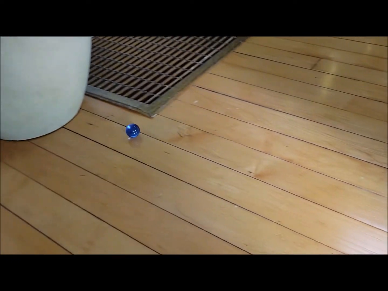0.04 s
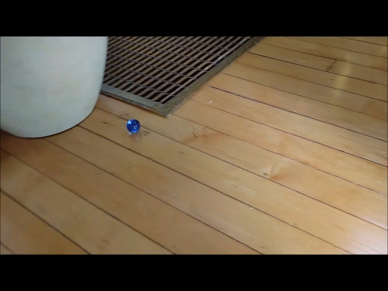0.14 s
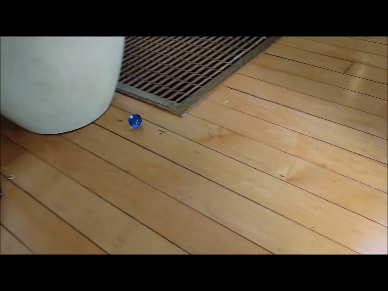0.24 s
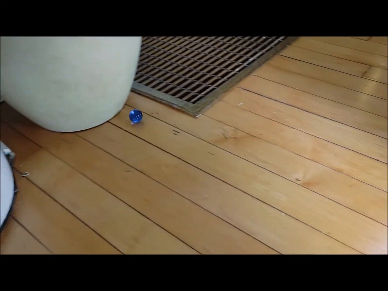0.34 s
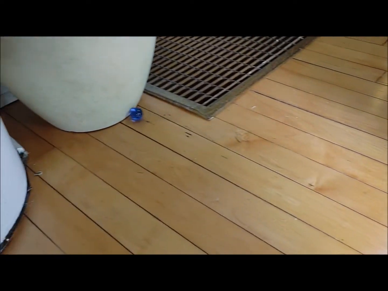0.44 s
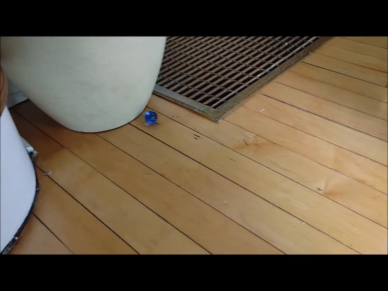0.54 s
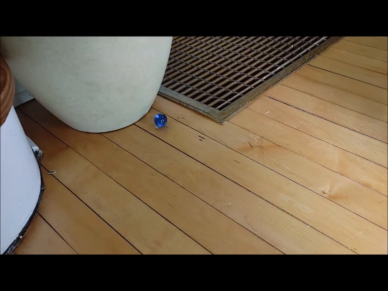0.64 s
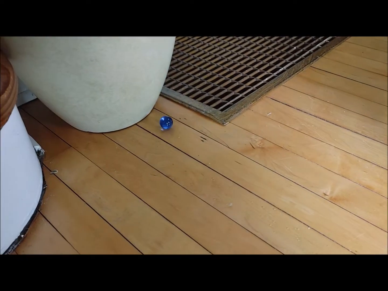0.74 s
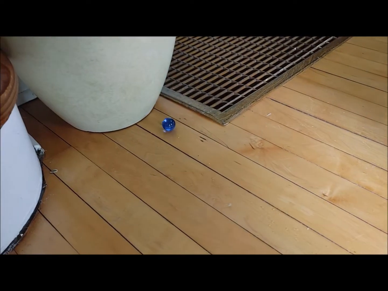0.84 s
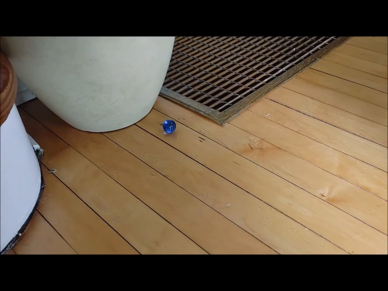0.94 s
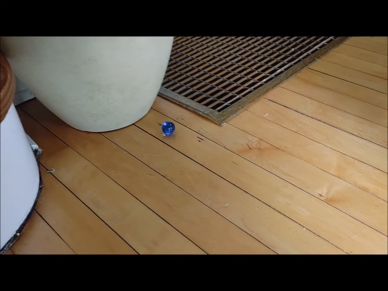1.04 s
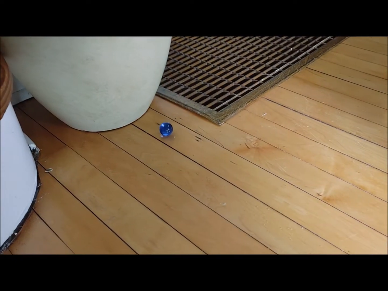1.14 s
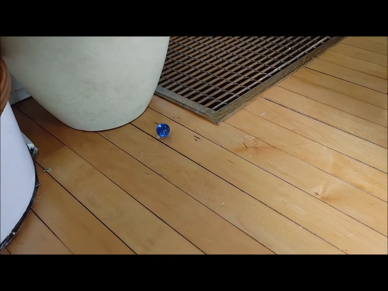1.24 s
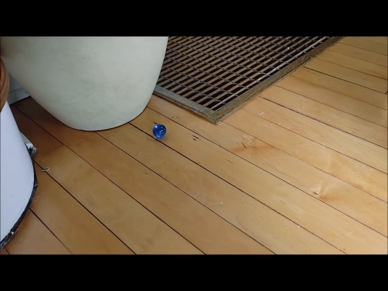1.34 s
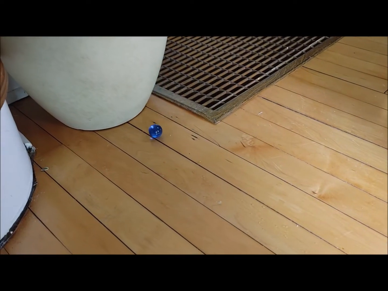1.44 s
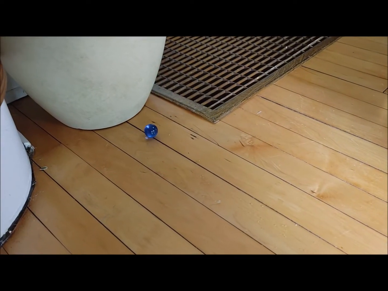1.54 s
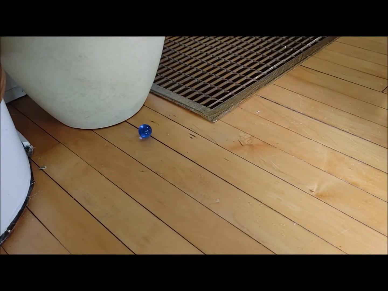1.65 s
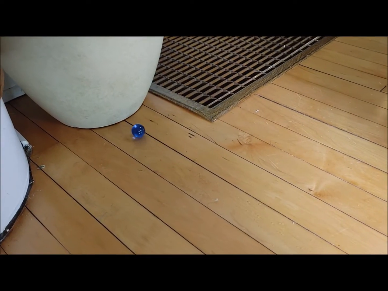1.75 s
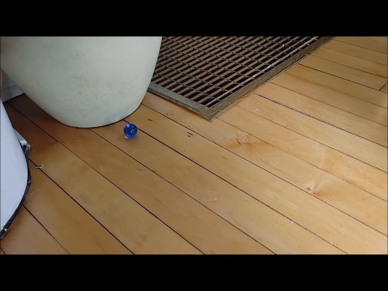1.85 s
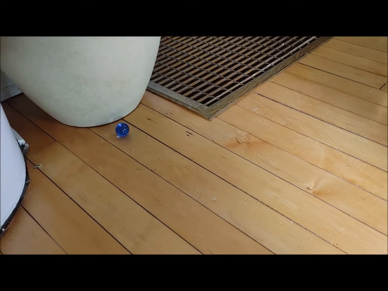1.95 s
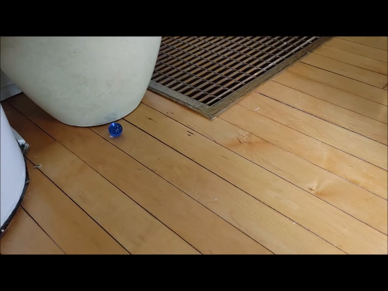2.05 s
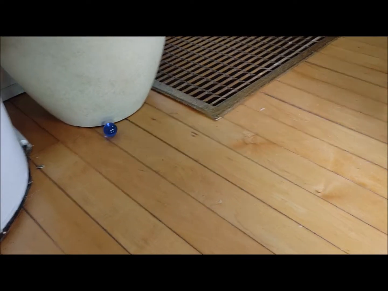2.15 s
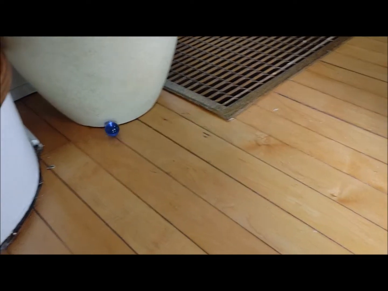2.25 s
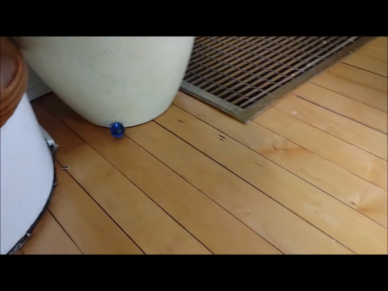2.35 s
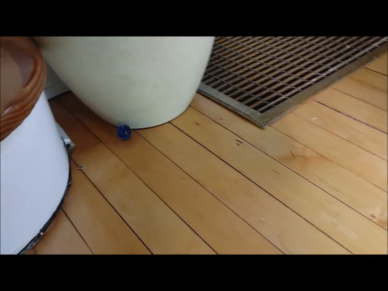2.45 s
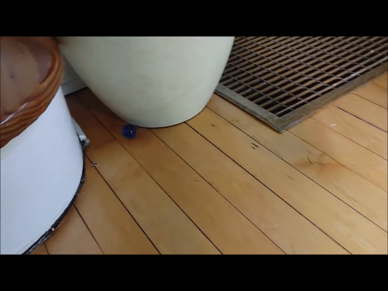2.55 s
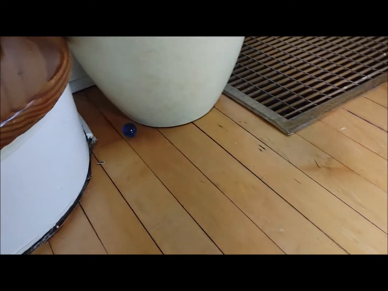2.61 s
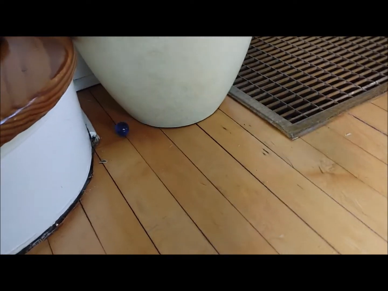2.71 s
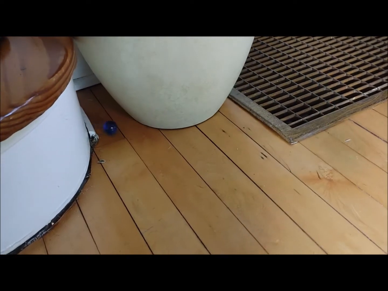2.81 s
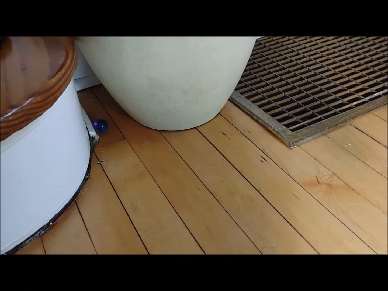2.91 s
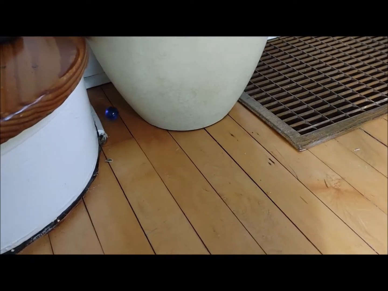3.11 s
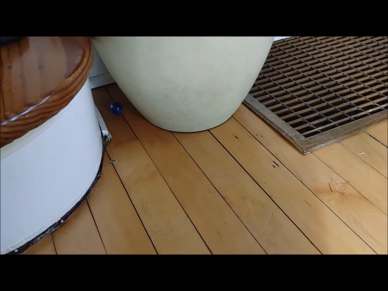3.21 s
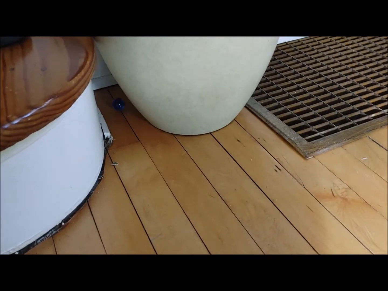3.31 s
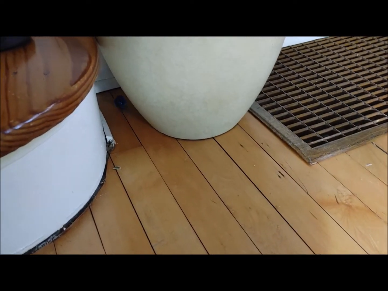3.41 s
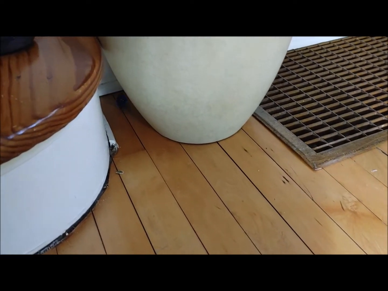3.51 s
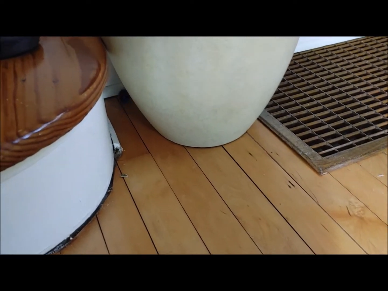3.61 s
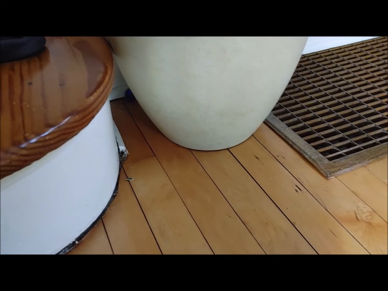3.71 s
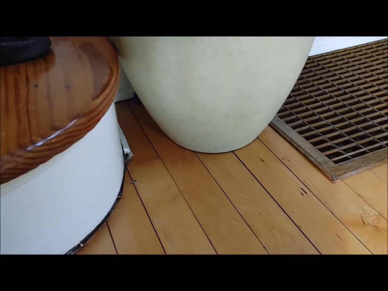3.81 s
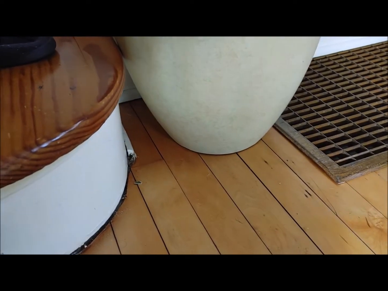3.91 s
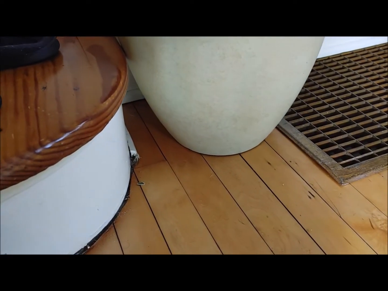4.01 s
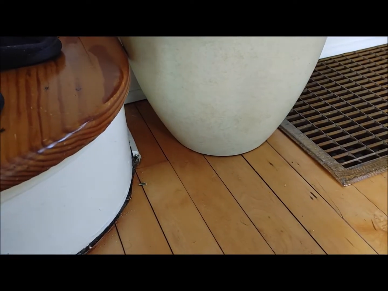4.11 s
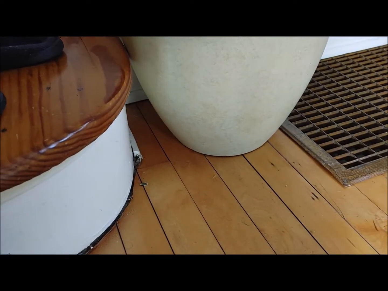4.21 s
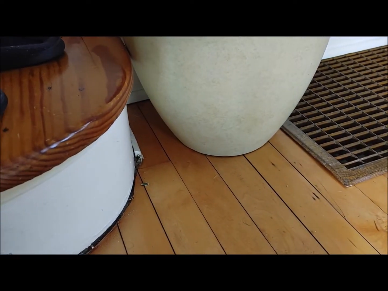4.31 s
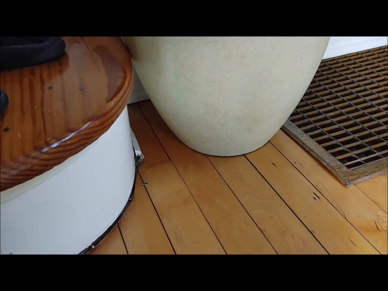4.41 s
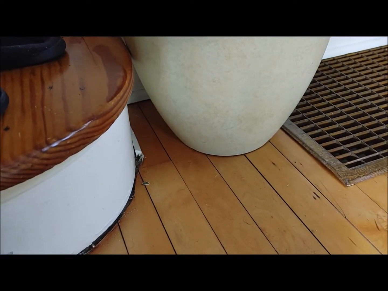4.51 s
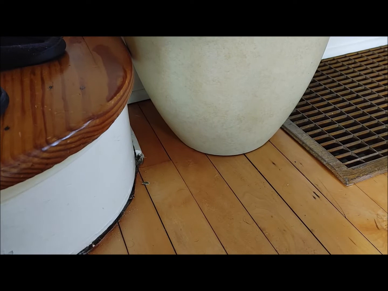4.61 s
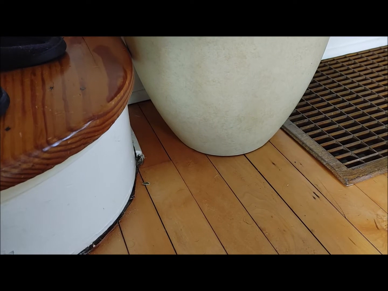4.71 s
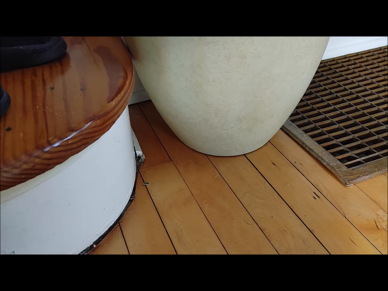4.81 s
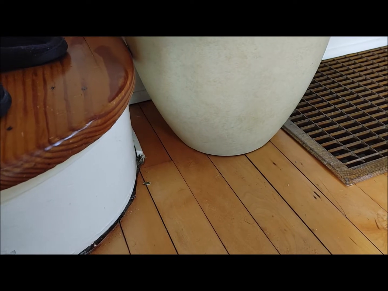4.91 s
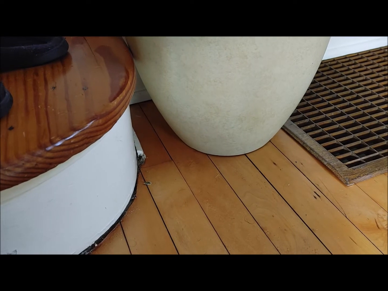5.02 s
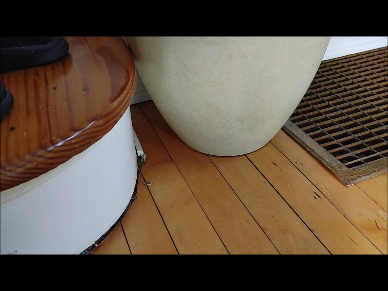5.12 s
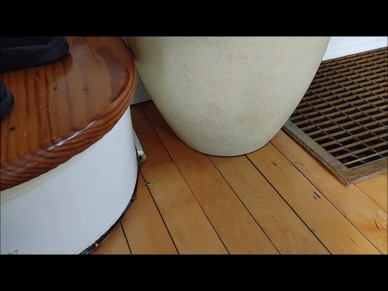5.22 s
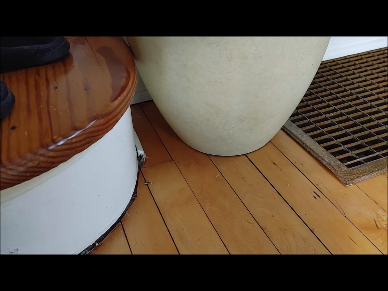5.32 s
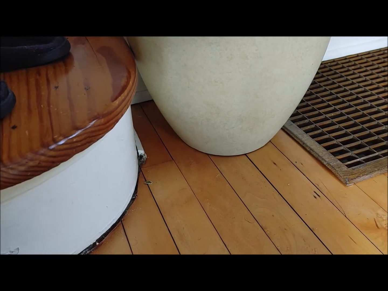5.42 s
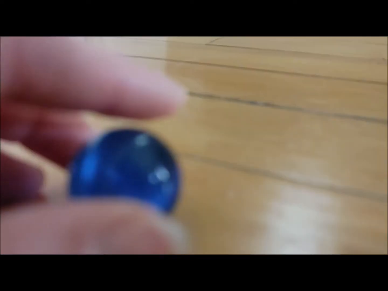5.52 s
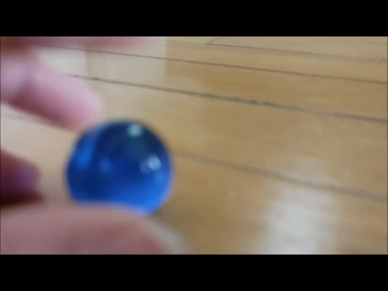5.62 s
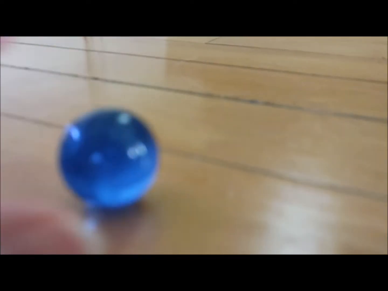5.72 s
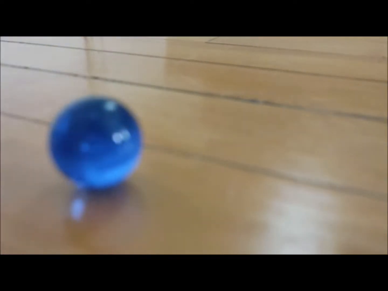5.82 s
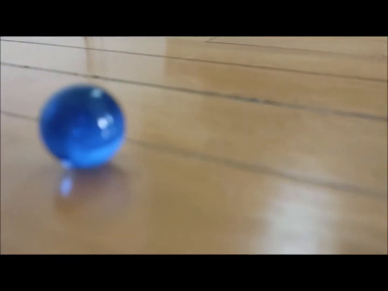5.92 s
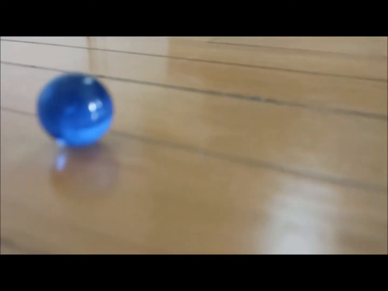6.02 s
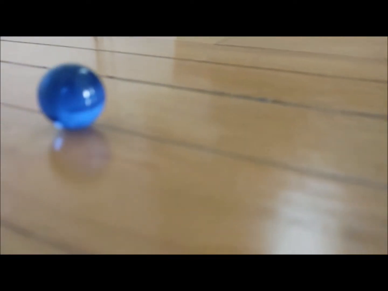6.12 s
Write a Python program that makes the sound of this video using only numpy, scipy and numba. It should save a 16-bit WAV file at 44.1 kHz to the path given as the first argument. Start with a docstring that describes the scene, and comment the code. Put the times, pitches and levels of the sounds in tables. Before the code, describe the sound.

A marble runs over wooden boards with hollow rattling, strikes a grate sharply, then nearly hushes. Sparse ticks grow into clicks and a deep woody rumble, stopped by a loud knock near a clay pot. Faint humming and a double tap follow. Sound cuts out briefly, then returns with a stronger low hum, a close hissing skin rub and light rolling ticks. Stereo microphone, short indoor echo.

```python
"""A glass marble rolls over wooden floorboards: its bumpy contact drives the boards' resonances. Seams, a grate
rim and a pot give knocks of ringing modes and a crack, and so do the hand's fingers catching on the floor; the
grate's slats ring on, a clay pot hums. The place is a small quiet room, a short diffuse echo over air noise and
an appliance hum. After a short silence a hand slides over the floor close to the microphone: hissing, rubbing
filtered noise. From the start of that silence the appliance hum is louder, and so is the air noise below 500
Hz."""
import sys
import numpy as np
from scipy import signal
from scipy.fft import rfft, irfft
from scipy.io import wavfile
from scipy.ndimage import uniform_filter1d, map_coordinates
from numba import njit

SR = 44100
rng = np.random.default_rng(int(sys.argv[2]) if len(sys.argv) > 2 else 0)


def wrap_up_sound(samples):
    """Save the sound to the file named by the first command line argument, as 16-bit audio."""
    columns = np.atleast_2d(samples).T
    # keep every value between -1 and 1, then stretch to whole-number steps
    tamed = np.clip(columns, -1, 1)
    steps = np.round(tamed * 32767).astype(np.int16)
    wavfile.write(sys.argv[1], SR, steps)


N = 271215

# steady air noise in the room: [f/Hz, relative level per Hz/dB]
AIR_SPECTRUM = [(30, -1.5), (70, -9.5), (115, 0), (184, -9), (239, -2), (290, -16), (437, -8.5), (822, -17),
                (1100, -24.5), (2410, -28), (6000, -40.5), (8000, -42), (11500, -35), (16000, -34.5)]
# appliance hum at a distance, before its level wavers: [f/Hz, rms level/dB]
HUM_FAR = [(118.4, -72.5), (215, -67.5), (241, -66)]
# appliance hum close by, before its level wavers: [f/Hz, rms level/dB]
HUM_NEAR = [(79.5, -55.5), (118.4, -46.5), (157, -58.5), (239, -68)]
# boards under the rolling marble:
# [t/s, lowest resonance before wander f/Hz, its level/dB, second and upper resonances relative level/dB]
ROLL_PATH = [(0.0, 267.7, -41.5, 13, 6), (.07, 263.7, -45, 2.5, -3.5), (.14, 270, -40.5, 1, -10.5),
             (0.22, 263, -41, 1, -4.5), (.3, 294, -43, 0, -5), (.38, 299, -46.5, -4.5, -1),
             (.45, 310, -35, -15.5, -5), (0.51, 320, -46.5, -6, 10), (0.56, 313.2, -57.5, 3.5, 10),
             (0.95, 275.3, -64, -8, -26), (1.5, 291.8, -68.5, -16, -27), (1.9, 393.3, -58.5, -11, -18.5),
             (2.2, 390, -54.5, -2, -12.5), (2.42, 385.5, -50, 6, -4), (2.62, 380, -49.5, 0, -0.5),
             (2.8, 372.4, -36, -14.5, -35), (2.96, 377, -36, -21.5, -33), (3.02, 384.6, -30, -3.5, -25.5),
             (3.08, 385, -38.5, -22.5, -31), (3.2, 387, -40, -24.5, -34.5), (3.4, 386, -35.5, -21, -33.5),
             (3.6, 377, -38.5, -20, -32), (3.74, 365, -31, -11, -18), (3.9, 395, -54, -17, -22),
             (4.3, 381, -67, -4, -20.5), (4.6, 385, -58, -13, -28), (5.0, 301, -80.5, -16, -26),
             (5.5, 271.2, -56.5, -17.5, -8), (5.72, 299, -58.5, 1.5, -3.5), (5.85, 320, -56.5, 9, -6),
             (5.94, 331, -54.5, 5.5, 6.5), (6.03, 297.5, -46, -12.5, -22), (6.09, 299.7, -44.5, 0, -12),
             (6.15, 318, -49, -10, -10)]
# upper board modes: [f/Hz, nominal width/Hz, relative level/dB]
BOARD_MODES = [(780, 78, 4), (894, 230, 17), (1136, 120, 9.5), (1330, 160, 0), (1620, 180, -5),
               (1884, 80, -4.5), (2380, 118.2, -4.5), (2950, 200, -11.5)]
# fine grit of the varnish: [t/s, centre before wander f/Hz, level/dB]
VARNISH_GRIT = [(0, 6750, -74.5), (.3, 6500, -67), (.52, 6700, -69.5), (.75, 6690, -89), (1.95, 6000, -96),
                (2.1, 6200, -74), (2.32, 6930, -66.5), (2.5, 6600, -67), (2.9, 6400, -81.5),
                (3.02, 6550, -67), (3.2, 6600, -68), (3.32, 6400, -89), (3.45, 6400, -100),
                (5.8, 6530, -100), (5.95, 6500, -86.5), (6.15, 6500, -69)]
# decay of the room's echo: [f/Hz, t60/s]
ROOM_DECAY = [(150, 0.14), (500, 0.36), (2000, 0.27), (6000, 0.27), (12000, 0.087)]
# knocks: [t/s, nominal peak level/dB, strongest ring f/Hz, thud f/Hz,
#          thud relative level/dB, tick relative level/dB, left minus right level/dB]
KNOCKS = [(0.035, -31, 1300, 247, -14, -42, -6), (0.137, -37, 1370, 407, 1, -29.5, -7),
          (0.158, -25, 2980, 667, -1, -31.5, 9.5), (0.181, -19.5, 2950, 377, -7.5, -36, -12.5),
          (0.26, -31, 1950, 310, -22, -43.5, -6.5), (0.393, -29.5, 1070, 476, -6.5, -33, -7),
          (0.433, -24.5, 1070, 197, -7, -34.5, -11), (0.506, -26.5, 1290, 336, -12.5, -37.5, -10.5),
          (0.5245, -14, 1380, 215, -1, -4.5, -15.5), (0.806, -59.5, 837, 249, 24.5, -5, -14),
          (1.678, -38, 1158, 591, 3.5, -28.5, 10), (1.852, -56.5, 800, 429, 15, -14, -2),
          (1.986, -49, 2430, 348, -21, -2.5, -19), (2.08, -59, 860, 423, 25.5, -15, 0),
          (2.108, -58, 700, 434, 21.5, -11, -2.2), (2.383, -29.5, 1456, 627, -11.5, -44, -5),
          (2.412, -38, 996, 632, -1, -6, -18.5), (2.503, -44, 1920, 380, -16, -22, -4),
          (2.52, -44.5, 1920, 630, 2, -14, -9), (2.588, -44.5, 1940, 384, 10, -17.5, 14.5),
          (2.661, -42.5, 955, 388, 4, -20, -4), (2.728, -32.5, 1100, 408, -2.5, -40, 0.5),
          (2.743, -31.5, 1113, 374, -17, -30, 6.5), (2.771, -48.5, 1030, 404, 3, -43, -6),
          (2.933, -52.5, 1100, 390, 16.5, -25.5, -2), (2.994, -27.5, 2030, 593, -5, -12, -3),
          (3.006, -31, 960, 361, 11.5, -22, -1), (3.297, -57, 1200, 430, 2.5, -1, -25),
          (3.331, -41.5, 1264, 380, 4, -36.5, 0), (3.349, -49, 1314, 400, 6.5, -42.5, -4),
          (3.435, -65, 1200, 393, 2, 0, -2), (3.475, -38.5, 1520, 418, -2.5, -41.5, 10),
          (3.643, -48.5, 1060, 380, 4.5, -27.5, -2.5), (3.674, -23, 2240, 326, -21.5, -44, 8),
          (3.754, -12, 2122, 388, -13.5, -1.5, -9), (3.7575, -23.5, 1384, 386, -7, -18.5, -1),
          (3.772, -22.5, 1080, 390, 4.5, -4, 4), (4.032, -57, 1075, 389, 16.5, -21, -3),
          (4.094, -50.5, 876, 387, 11, -41, 9), (4.197, -57, 857, 387, 16, -24, -8),
          (4.478, -57.5, 857, 261, 17, -20, -1), (4.66, -56, 872, 430, 15, -18, 2),
          (4.835, -27.5, 1008, 488, -7, -8.5, -12), (4.849, -38, 1010, 406, 9, -9, 5),
          (5.852, -51, 4250, 300, -17, -8, -5), (5.918, -43, 2940, 584, -15, -16, -27),
          (5.951, -40.5, 1526, 501, 0.5, -9.5, -30), (6.005, -41.5, 1070, 299, 8, -46, -7),
          (6.048, -44, 1350, 600, 5, -46, -5.5), (6.081, -45.5, 1106, 497, 6.5, -45, -4),
          (6.115, -43.5, 930, 618, 11, -32, 4), (6.139, -45.5, 1030, 272, 15, -22, -11)]
# wood modes that a knock rings, before random spread: [f/Hz, relative level/dB, t60/s]
WOOD_MODES = [(140, -4, .2), (190, -4, .12), (240, -2, .1), (310, 0, .08), (385, 0, .07), (480, -2, .05),
              (640, -3, .035), (800, -3, .03), (930, -2, .03), (1050, 0, .04), (1190, -2, .025),
              (1380, -1, .03), (1850, -3, .02), (2030, -1, .02), (2430, -3, .015), (2800, -2, .02),
              (3070, 0, .022), (5300, -6, .012)]
# grate slats after the marble strikes the rim: [f/Hz, relative level/dB, t60/s]
GRATE_MODES = [(285, -8.5, 0.32), (365, -7, .25), (580, 5.5, 0.069), (687, -4.5, 0.26), (927, -3.5, 0.27),
               (1084, -15.5, 0.12), (1280, -7.5, 0.2), (1340, -13.5, 0.11), (1830, -16.5, .13),
               (5600, -18.5, 0.26), (5545, -23.5, 0.25), (6020, -14, 0.18)]
# faint hum of the clay pot while the marble rolls behind it: [start t/s, length/s, level/dB]
POT_SWELLS = [(4.05, 0.22, -61.5), (4.45, 0.21, -63), (5.05, 0.29, -72.5)]
# skin sliding on the floor: [t/s, squeak level/dB, broad rub level/dB]
HAND_SLIDE = [(5.67, -100, -96), (5.71, -65.5, -68.5), (5.77, -46, -52.5), (5.81, -48.5, -45),
              (5.85, -50, -40), (5.88, -92, -49.5), (5.92, -74.5, -41), (5.955, -57.5, -38.5),
              (5.99, -96, -89)]
# bands of the rub: [f/Hz, nominal width/Hz, relative level/dB]
RUB_BANDS = [(1104, 370, -12), (1472, 130, -4.5), (2040, 120, 0.5), (2770, 150, 2.5), (3510, 170, 3.5),
             (4050, 130, -2.5), (5340, 900, -18.5), (8610, 380, -10.5), (11840, 4000, -16)]
# microphone response: [f/Hz, gain/dB]
MIC_RESPONSE = [(40, -17), (110, -0.5), (5000, -2), (6800, -3.5), (7400, -10), (8100, -10), (9500, -6),
                (16000, -8)]

# place and microphone
SILENCE_START_S, SILENCE_END_S = 5.372, 5.506
AIR_DB, NEAR_AIR_DB = -57.5, 8.5
ROOM_DB = 2
PORT_LAG_S = 0.00018
SOFT_TOP = 0.8  # peaks round off towards this level
TOP_HZ = 15900

# rolling
FAST_UNTIL_S = .522  # the marble meets the grate rim
BOARD_WANDER, PATCHY_DB = 0.15, 2
SECOND_HZ, SECOND_WIDTH_HZ = 630.5, 60
SECOND_NEAR_GRATE_HZ = 683  # the boards crossed before the rim ring a little higher
BETWEEN_HZ, BETWEEN_DB = 480.6, -7.5  # a broad resonance between the two lowest
FAST_RATTLE_DB, RATTLE_ABOVE_HZ = 9, 1500  # the quick first run shakes the highest board modes harder
GRIT_BELOW_HZ, GRIT_BELOW_DB = 3700, 1  # a duller, wider part of the grit

# knocks: share sent to the room in the open, hidden behind the pot, and close by after the silence
KNOCK_ROOM_DB, HIDDEN_ROOM_DB, CLOSE_ROOM_DB = -4.5, -0.5, -9.5
HIDDEN_FROM_S = 3.72
ROOM_DULLING = 0.18  # dB per octave lost on the way to the room, for each dB that the tick is weak
PAN_FULL_HZ = 2480  # below this a knock sounds ever more alike at both ports
RIM_S, RIM_TOP_DB = .5245, 12  # the metal rim of the grate gives a brighter knock
TOP_DB, TOP_PER_TICK = -30, .6
SWELL_CYCLES = 1.5  # a mode needs this long to build up, so the low ones come late
RING_S, RING_SHORTENS = 0.0077, 0.82  # decay of a spot at 1 kHz; higher ones die faster by this power
SPOT_IN_ROOM = 0.57  # the spot's own rings carry less far
SPOT_LOSS, FIRM_TICK_DB = 0.37, -25.5  # a tick above this costs the spot's ring so many dB per dB
ECHO_S, ECHO_SHARE = 0.000976, 0.26  # the crack comes again off a hard surface close by

# grate, pot and hand
GRATE_DB, GRATE_CHATTER_DB = -27.5, 3
POT_HZ, POT_FADE_S = 857, 0.07
SQUEAK_HZ, SQUEAK_LOWEST_HZ = 6900, 5830
SQUEAK_SINKS_S, SQUEAK_SINK_HZ_PER_S = 5.81, 60000


def undb(db):
    """Amplitude factor for a level in dB."""
    return 10 ** (np.asarray(db) / 20)


def unit(x):
    """Scales to an rms of 1."""
    return x / np.sqrt(np.mean(x ** 2))


def along(table, hz):
    """Reads (f/Hz, value) rows on a log-frequency axis."""
    f, v = np.transpose(table)
    return np.interp(np.log(np.maximum(hz, 1)), np.log(f), v)


def curves(rows):
    """Joins the rows of a t/s table into one curve per column."""
    s, *columns = np.transpose(rows)
    return [np.interp(np.arange(N) / SR, s, c) for c in columns]


@njit
def svf(x, hz, width):
    """State-variable band-pass with a moving centre, gain 1 there."""
    y, b, l = np.empty(len(x)), 0., 0.
    for i in range(len(x)):
        g, k = np.tan(np.pi * hz[i] / SR), width / hz[i]
        v = (b + g * (x[i] - l)) / (1 + g * (g + k))
        b, l, y[i] = 2 * v - b, l + 2 * g * v, k * v
    return y


def band(x, hz, width):
    """Band-pass at a fixed or moving centre, kept within a safe range."""
    return svf(x, np.clip(hz + np.zeros(N), 20, .45 * SR), float(max(width, 1)))


def twice(x, hz, width):
    """A resonance with steep skirts, at an rms of 1."""
    return unit(band(band(x, hz, width), hz, 2.0 * width))


def walk(rate):
    """Random levels held 1 / rate s and slewed twice."""
    k = int(SR / rate)
    steps = np.repeat(rng.standard_normal(N // k + 1), k)
    return 0.64 * uniform_filter1d(uniform_filter1d(steps, k), k)[:N]


def bumps(rate, spread_db):
    """Tiny impacts at random moments (rate per second) with a long tail of sizes."""
    u, sign, size = rng.random(N), rng.standard_normal(N), rng.exponential(1, N)
    return unit((u < rate / SR) * sign * undb(spread_db * size))


def bump(bins, hz, octaves):
    """Bell of height 1 on a log-frequency axis."""
    return np.exp(-(np.log2(bins / hz + 1e-9) / octaves) ** 2)


def causal(db):
    """Spectrum of a filter with these gains that does not sound before it is struck."""
    ceps = irfft(np.log(undb(db)))
    fold = 2. * (np.arange(ceps.shape[-1]) < ceps.shape[-1] // 2)
    fold[0] = 1
    return np.exp(rfft(ceps * fold))


def swells(rows, fade_s):
    """Gain that rises, holds and falls again for each (start, length, level) row."""
    t = np.arange(N) / SR
    gain = 0
    for s, length, db in rows:
        inside = np.minimum(t - s, s + length - t)
        gain = gain + undb(db) * np.clip(inside / fade_s + .5, 0, 1) ** 2
    return gain


def ports(x, pan_db):
    """Two microphone ports: a level difference, and the right one hears it a little later."""
    late = map_coordinates(x, [np.arange(N) - PORT_LAG_S * SR], order=3)
    return np.array([x * undb(pan_db / 2), late * undb(-pan_db / 2)])


def house():
    """Shaped air noise and wavering hum partials; hum and low air are louder from the silence on."""
    t = np.arange(N) / SR
    bins = np.fft.rfftfreq(N, 1 / SR)
    mid, side = rfft(rng.standard_normal((2, N))) * undb(along(AIR_SPECTRUM, bins))
    side = side * (np.clip(bins / 1100, 0, 1) + 0.5 * (bins < 50) + 0.12)
    near = t > SILENCE_START_S
    low = irfft(mid * (bins < 500), N)
    air = irfft([mid + side, mid - side], N)
    scale = undb(AIR_DB) / np.sqrt(np.mean(irfft(mid, N) ** 2))
    out = scale * (air + near * (undb(NEAR_AIR_DB) - 1) * low)
    for lines, on, waver_db in ((HUM_FAR, ~near, 3.0), (HUM_NEAR, near, 1.2)):
        for hz, db in lines:
            level = np.sqrt(2) * undb(db + waver_db * walk(20.0))
            out = out + on * level * np.sin(2 * np.pi * hz * t + 0.2 * walk(21.0))
    return out


def rolling():
    """Grain of the wood shakes the board under the marble; the varnish adds fine grit."""
    hz, low_db, second_db, upper_db = curves(ROLL_PATH)
    hz = hz * (1 + BOARD_WANDER * walk(15))
    fast = np.arange(N) < FAST_UNTIL_S * SR
    force = bumps(2500, 3.0) * undb(1.8 * walk(30))
    low = twice(force, hz, 77.0) * undb(PATCHY_DB * walk(9.1))

    second_hz = np.where(fast, SECOND_NEAR_GRATE_HZ, SECOND_HZ) * (1 + 0.01 * walk(15))
    second = twice(force, second_hz, SECOND_WIDTH_HZ) * undb(PATCHY_DB * walk(23))
    between = twice(force, BETWEEN_HZ * (1 + 0.1 * walk(24)), 110.0)
    second = second + undb(BETWEEN_DB) * between

    # specks and dents tick the upper modes more sparsely
    ticks = force + 0.9 * bumps(300, 1.6)
    upper = 0
    for f, w, db in BOARD_MODES:
        rattle_db = FAST_RATTLE_DB * fast * (f > RATTLE_ABOVE_HZ)
        upper = upper + undb(db + 1.6 * walk(12) + rattle_db) * twice(ticks, f, 1.1 * w)

    grit_hz, grit_db = curves(VARNISH_GRIT)
    specks = bumps(4500, 2.1)
    grit = twice(specks, grit_hz * (1 + .03 * walk(21)), 2900)
    grit = grit + undb(GRIT_BELOW_DB) * twice(specks, GRIT_BELOW_HZ, 3500)
    boards = low + second * undb(second_db) + unit(upper) * undb(upper_db)
    return undb(low_db) * boards + grit * undb(grit_db)


def room(x):
    """Diffuse echo: noise that dies at its own rate in each band, alike at both ports only in the bass."""
    t = np.arange(int(.7 * SR)) / SR
    tail = 0
    for hz in 100 * 2 ** np.arange(0, 7.6, .5):
        sos = signal.butter(2, [hz / 1.211, hz * 1.19], "bandpass", fs=SR, output="sos")
        mid, side = signal.sosfilt(sos, rng.standard_normal((2, len(t))))
        wide = np.clip(hz / 900, 0, 1) * side * np.array([[1], [-1]])
        tail = tail + (mid + wide) * np.exp(-np.log(1000) * t / along(ROOM_DECAY, hz))
    tail = tail * np.clip((t - .004) / 0.0015, 0, 1)  # the echo starts after 4 ms
    tail = tail / np.sqrt(np.sum(tail ** 2) / 2)
    return undb(ROOM_DB) * signal.fftconvolve(x[None], tail, axes=1)[:, :N]


def wood_rings(t):
    """Decaying modes of the wood, with new random weights, tunings and phases for each blow."""
    hz, db, t60 = np.transpose(WOOD_MODES)[:, :, None]
    luck = rng.standard_normal((len(WOOD_MODES), 3))
    phase = 2 * np.pi * hz * (1 + .02 * luck[:, 1:2]) * t + .6 * luck[:, 2:]
    decay = np.exp(-np.log(1000) * t / t60) * (1 - np.exp(-hz * t / SWELL_CYCLES))
    return (undb(db + 2 * luck[:, :1]) * np.sin(phase) * decay).sum(axis=0)


def spot_rings(t, ring_hz, thud_hz, tick_db):
    """The spot that is hit has its own two strongest rings: a fast decay and a thud that swells first."""
    loss = undb(-SPOT_LOSS * max(tick_db - FIRM_TICK_DB, 0))
    decay = np.exp(-t / RING_S * (ring_hz / 1000) ** RING_SHORTENS)
    ring = 1.66 * loss * np.sin(2 * np.pi * ring_hz * t) * decay
    thud = 1.3 * np.sin(2 * np.pi * thud_hz * t) * t / 0.0056 * np.exp(1 - t / 0.0042)
    return ring + thud


def knock_colour(bins, ring_hz, thud_hz, thud_db, tick_db, rim_db):
    """Gains in dB set by thud and tick: a weak tick takes away the treble."""
    colour = along([(thud_hz / 4, thud_db - 38.0), (thud_hz / 1.47, thud_db - 8.0),
                    (500, thud_db + 0.5), (850, 0), (1400, 0),
                    (2500, 0.036 * tick_db), (3500, 0.55 * tick_db), (4800, tick_db), (7500, tick_db),
                    (11000, TOP_DB + TOP_PER_TICK * tick_db + rim_db)], bins)
    ring_bump = 3.0 * bump(bins, ring_hz, 0.2) * np.array([[1], [1], [SPOT_IN_ROOM]])
    return colour + ring_bump + 4.5 * bump(bins, thud_hz, 0.63)


def knock_paths(bins, pan_db, tick_db, room_db):
    """Gain and lag to the left port, the right port and the room."""
    lag = np.exp(-2j * np.pi * bins * np.array([[0], [PORT_LAG_S], [0]]))
    pan = pan_db / 2 * np.array([[1], [-1], [0]]) * np.clip(bins / PAN_FULL_HZ, .15, 1) ** .5
    dulling = ROOM_DULLING * min(tick_db, 0) * np.log2(np.maximum(bins / 1200, 1))
    return undb(pan + np.array([[0], [0], [1]]) * (room_db + dulling)) * lag


def knocks():
    """Each blow rings wood and spot under a short crack; returns both ports and the share for the room."""
    lead = SR // 100
    out, t = np.zeros((3, N + SR)), np.arange(SR // 4) / SR
    bins = np.fft.rfftfreq(len(t) + lead, 1 / SR)
    contact = (1 - np.exp(-t / .0003)) * np.cos(np.pi / 2 * t / t[-1])
    echo = 1 + ECHO_SHARE * np.exp(-2j * np.pi * bins * ECHO_S)
    for s, peak_db, ring_hz, thud_hz, thud_db, tick_db, pan_db in KNOCKS:
        spot = spot_rings(t, ring_hz, thud_hz, tick_db) * np.array([[1], [1], [SPOT_IN_ROOM]])
        blow = np.pad((wood_rings(t) + spot) * contact, ((0, 0), (lead, 0)))

        # the crack covers all frequencies evenly
        crack = rng.standard_normal(len(t)) * np.exp(-t / .002)
        snap = rfft(np.pad(crack * contact, (lead, 0)))
        snap = 33.0 * snap / uniform_filter1d(np.abs(snap), size=90) * echo

        rim_db = RIM_TOP_DB * (abs(s - RIM_S) * SR < lead)
        colour = knock_colour(bins, ring_hz, thud_hz, thud_db, tick_db, rim_db)
        if s < HIDDEN_FROM_S:
            room_db = KNOCK_ROOM_DB
        elif s < SILENCE_START_S:
            room_db = HIDDEN_ROOM_DB
        else:
            room_db = CLOSE_ROOM_DB
        paths = knock_paths(bins, pan_db, tick_db, room_db)
        spectrum = (rfft(blow) + snap) * causal(peak_db - 6.5 + colour) * paths
        i = int(s * SR) - lead
        out[:, i:i + blow.shape[1]] += irfft(spectrum, blow.shape[1])
    return out[:2, :N], out[2, :N]


def grate():
    """Struck at the rim, metal slats ring and chatter unevenly in their frame."""
    t = np.maximum(np.arange(N) / SR - RIM_S, 0)
    rings = 0
    for hz, db, t60 in GRATE_MODES:
        level = undb(db + GRATE_CHATTER_DB * walk(90.55))
        rings = rings + level * np.sin(2 * np.pi * hz * t) * np.exp(-np.log(1000) * t / t60)
    return undb(GRATE_DB) * rings


def pot():
    """One narrow ring kept going by noise that stands for the floor's shaking."""
    return twice(rng.standard_normal(N), POT_HZ, 13) * swells(POT_SWELLS, POT_FADE_S)


def hand():
    """Skin slips on the floor: a narrow hiss that sinks in pitch and a wider rub."""
    squeak_db, rub_db = curves(HAND_SLIDE)
    sinking = SQUEAK_HZ - SQUEAK_SINK_HZ_PER_S * (np.arange(N) / SR - SQUEAK_SINKS_S)
    hz = np.clip(sinking, SQUEAK_LOWEST_HZ, SQUEAK_HZ) * (1 + .025 * walk(150))
    slips = bumps(7000, 1.6) * undb(2.5 * walk(60))
    rub = 0
    for f, w, db in RUB_BANDS:
        centre = f * (1 + .03 * walk(14) + .02 * walk(80))
        rub = rub + undb(db + 4.0 * walk(30)) * twice(slips, centre, 1.4 * w)
    squeak = twice(slips, hz, 330) * undb(5 * walk(90))
    return squeak * undb(squeak_db) + unit(rub) * undb(rub_db)


def scene():
    """Places each source at the ports and sends its share to the room."""
    air_and_hum = house()
    roll = rolling() + pot()
    hits, hits_far = knocks()
    metal = grate()
    skin = hand()
    dry = ports(roll, 0.83) + ports(skin, -8.5) + ports(metal, -1.5) + hits
    return dry + room(.5 * roll + 0.07 * skin + 0.49 * metal + hits_far) + air_and_hum


def record(dry):
    """Microphone response with a treble notch, rounded loud peaks, a short silence and a cut top."""
    t = np.arange(N) / SR
    response = undb(along(MIC_RESPONSE, np.fft.rfftfreq(N, 1 / SR)))
    sound = irfft(rfft(dry) * response, N)
    sound = SOFT_TOP * np.tanh(sound / SOFT_TOP)
    outside_s = np.maximum(SILENCE_START_S - t, t - SILENCE_END_S)
    sound = sound * np.clip(outside_s / .002, 0, 1)
    return signal.sosfilt(signal.ellip(10, .2, 80, TOP_HZ, fs=SR, output="sos"), sound)


dry = scene()
out = record(dry)
wrap_up_sound(out)
```